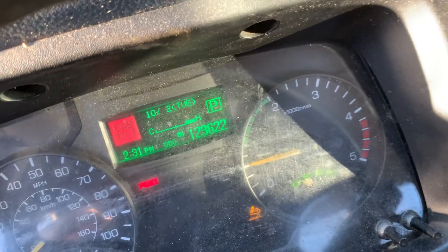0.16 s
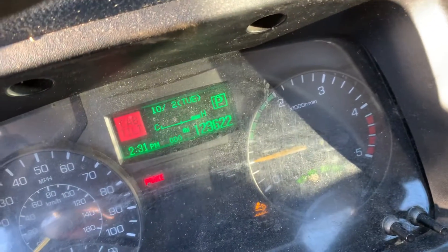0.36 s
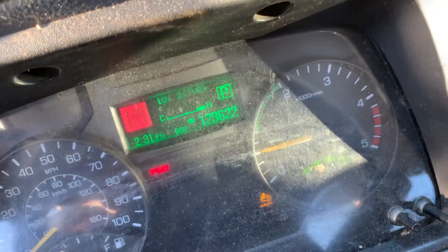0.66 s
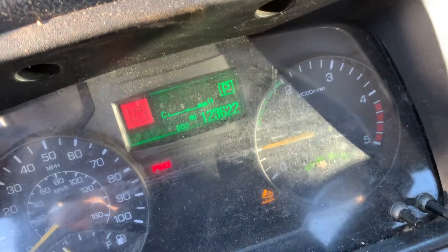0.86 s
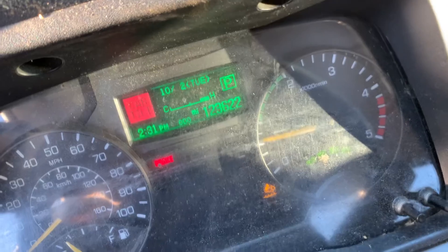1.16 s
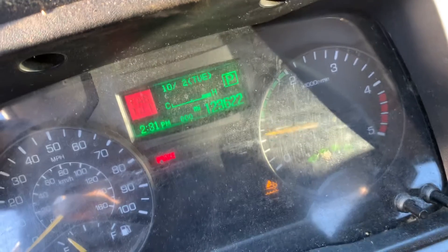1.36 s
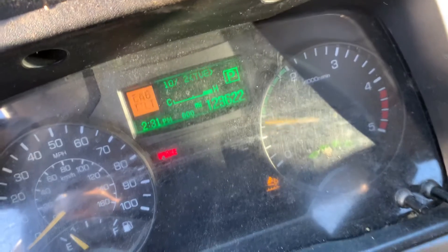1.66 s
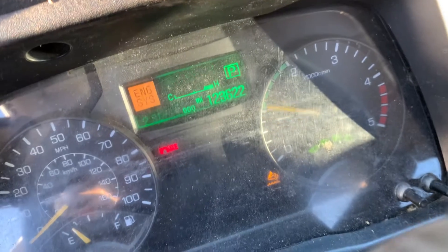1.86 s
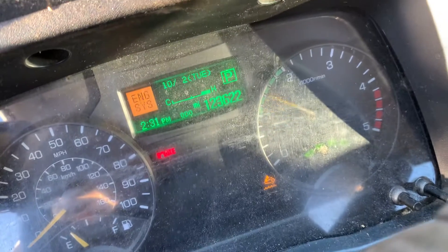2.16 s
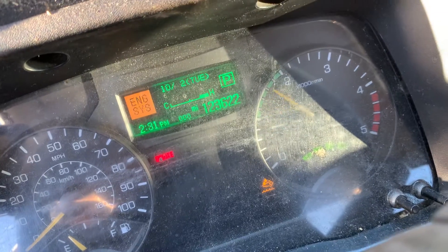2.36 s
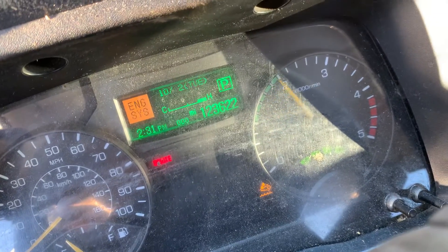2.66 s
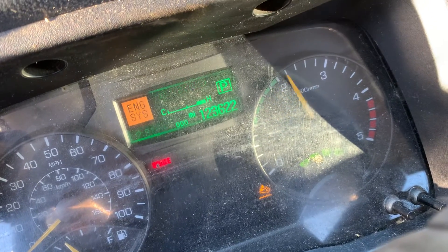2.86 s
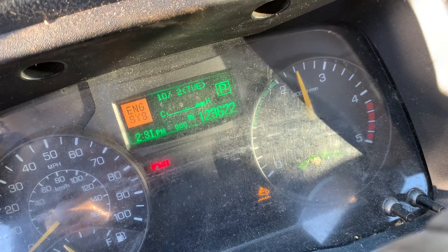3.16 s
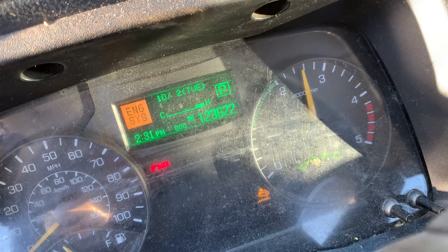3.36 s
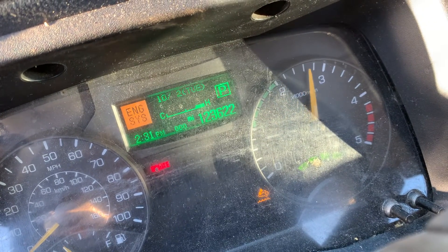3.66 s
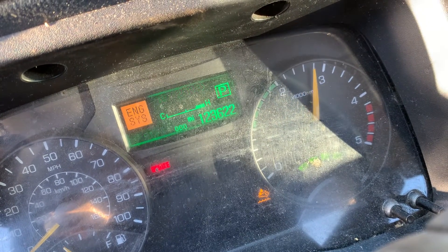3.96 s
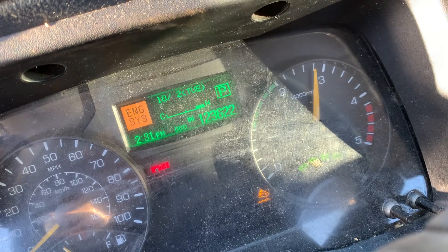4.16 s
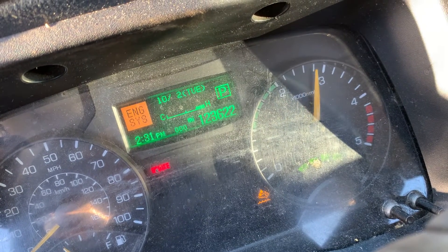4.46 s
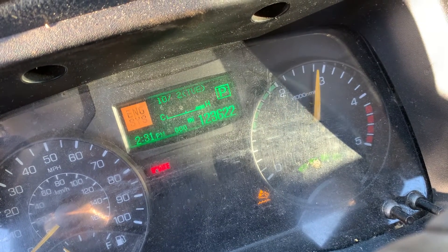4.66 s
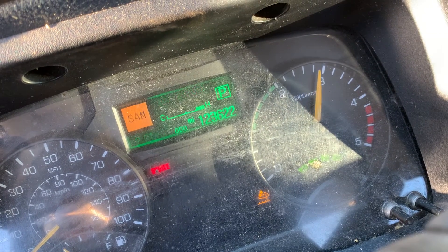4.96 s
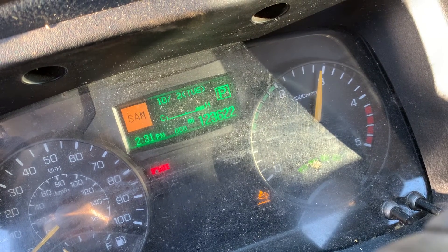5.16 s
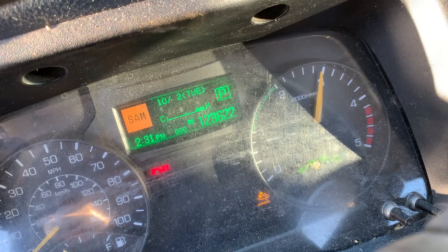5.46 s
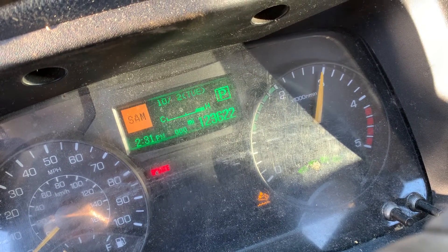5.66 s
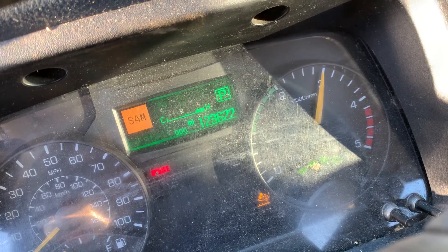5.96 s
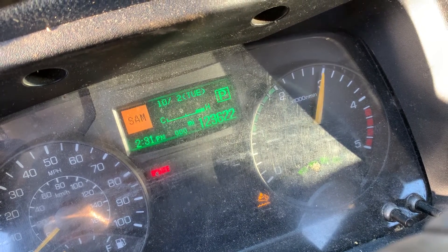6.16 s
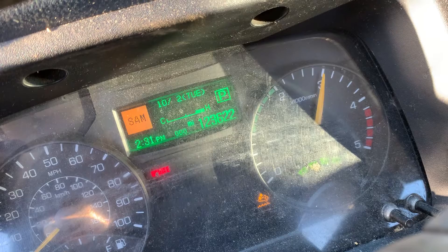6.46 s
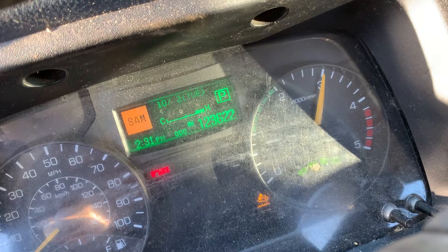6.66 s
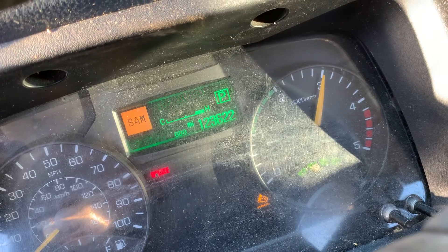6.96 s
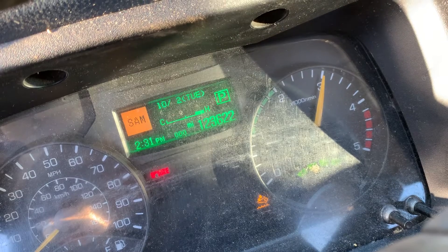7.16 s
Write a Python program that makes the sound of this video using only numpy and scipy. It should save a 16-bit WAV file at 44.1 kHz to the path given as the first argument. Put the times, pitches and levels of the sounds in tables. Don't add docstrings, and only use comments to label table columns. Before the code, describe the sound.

A diesel engine heard from the driver's seat: soft lumpy idle, two short air-valve hisses with clicking bounces, a light rub of cloth, then a quick climb in speed. The pitch more than quadruples and holds as a thick boomy drone, with rough valve clatter, intake roar, tiny key clinks, loose panels humming and a wavering whine, all close and enclosed.

```python
import sys
import numpy as np
from scipy import signal
from scipy.fft import rfft, irfft, next_fast_len
from scipy.io import wavfile
from scipy.ndimage import uniform_filter1d

SR = 44100
rng = np.random.default_rng(int(sys.argv[2]) if len(sys.argv) > 2 else 0)


def store_wav(level_fs):
    pcm = np.round(np.clip(np.atleast_2d(level_fs), -1, 1) * 32767)
    wavfile.write(sys.argv[1], SR, pcm.T.astype(np.int16))


def volts_from_decibels(level):
    exponent = np.asarray(level, float) / 20
    return 10 ** exponent


N = 321930
T = np.arange(N) / SR
MILLIS = np.arange(0, N / SR + 1, 1 / 1000)
STEP, PART = (T * 1000).astype(int), (T * 1000 % 1).astype(np.float32)
FFT_SIZE, HOP = 2048, 512
FRAMES = np.arange(N // HOP + 3) * HOP / SR
BINS = np.fft.rfftfreq(FFT_SIZE, 1 / SR)

# frequency in Hz, likeness 0-1, phase lead in rad.
PORTS = [(60, .5, 11.5), (100, .6, 3), (250, .4, 2.5), (430, .8, 0.5), (700, 1, -2.03), (1000, .8, -1.34),
         (1400, .5, -1.9), (1800, .6, 1), (2200, .6, 1.4), (3300, .5, 1.66), (6000, .5, 1.5),
         (12000, .9, 1.6)]


def evened(x):
    return x / np.sqrt(np.mean(abs(x) ** 2) + 1e-20)


def curves(rows, t):
    s, *columns = np.transpose(rows)
    return [np.interp(t, s, c) for c in columns]


def smooth(v):
    v = v.astype(np.float32)
    return v[STEP] + np.diff(v)[STEP] * PART


def drift(per_s, count):
    x = rng.standard_normal((count, len(MILLIS)))
    for _ in range(2):
        x = uniform_filter1d(x, max(int(500 / per_s), 1), axis=1)
    return x / x.std(1, keepdims=True)


def spectra(x):
    padded = np.pad(x, ((0, 0), (0, 4096)))
    return signal.stft(padded, nperseg=FFT_SIZE, noverlap=FFT_SIZE - HOP)[2][..., :len(FRAMES)]


def sound(z):
    return signal.istft(z, nperseg=FFT_SIZE, noverlap=FFT_SIZE - HOP)[1][..., :N]


def colour(points):
    hz, db = np.transpose(points)
    bins_db = np.interp(np.log(BINS + 1), np.log(hz), db, left=-120, right=-120)
    return evened(volts_from_decibels(bins_db))[:, None]


def patches(depth_db):
    field = rng.standard_normal((len(FRAMES), len(BINS))).T
    field = uniform_filter1d(field, size=7, axis=0)
    field = uniform_filter1d(field, size=9, axis=1)
    return volts_from_decibels(depth_db * evened(field))


def swell(start_s, length_s, db, fade_db_per_s):
    outside_s = np.maximum(start_s - T, T - start_s - length_s)
    return volts_from_decibels(db - fade_db_per_s * np.maximum(outside_s, 0))


def tones(cycles, table, waver_db, waver_per_s, slip_rad):
    level, phase = drift(waver_per_s, count=2 * len(table)).reshape(2, len(table), -1)
    out = np.zeros(N)
    for i, (multiple, db) in enumerate(table):
        turns = multiple * cycles
        angle = 2 * np.pi * (turns - np.floor(turns)) + smooth(9 * i * i + slip_rad * phase[i])
        out += smooth(volts_from_decibels(db + waver_db * level[i])) * np.cos(angle.astype(np.float32))
    return np.sqrt(2) * out


def glide(hz, gain, waver_db, slip_rad):
    return gain * tones(np.cumsum(hz) / SR, [(0.99, 0.00061)], waver_db, 9, slip_rad)


def bursts(white, events, points, rise_s, side_db):
    gain = np.zeros(N)
    for start_s, db, hold_s, t60_s in events:
        decay_db = 60 * np.maximum(T - start_s - hold_s, 0) / t60_s
        gain += volts_from_decibels(db - decay_db) * np.clip((T - start_s) / rise_s, 0, 1)
    return gain * sound(colour(points) * white) * volts_from_decibels([[0], [side_db]])


def at_ports(x):
    # frequency in Hz, level in dB.
    tone_side = [(60, -26), (150, -25.5), (260, -22.5), (420, -13.5), (800, 2.5), (1300, 10), (1900, -12.5),
                 (3000, -1), (11000, -4.5)]
    size = next_fast_len(N + SR)
    hz = np.fft.rfftfreq(size, 1 / SR)
    step = volts_from_decibels(curves(tone_side, hz)[0]) * np.exp(1j * curves(PORTS, hz)[1])
    return np.array([x, irfft(rfft(x, size) * step, size)[:N]])


def firing_hz(t):
    # time in seconds, firing rate in Hz.
    run_up = [(0, 21.6), (.75, 21.8), (1.12, 28.2), (1.3, 33), (1.62, 48.4), (1.75, 52.6), (1.88, 55.2),
              (2.12, 70.3), (2.38, 79.5), (2.75, 87.5), (3.1, 92.6), (3.5, 96.4), (4.03, 93.4),
              (4.42, 96.5), (4.75, 97.6), (5.6, 99.0), (6.4, 99.6), (7.3, 99.75)]
    return curves(run_up, t)[0]


def rev_share(t):
    idle_hz, rev_hz = 30, 92
    return np.clip((firing_hz(t) - idle_hz) / (rev_hz - idle_hz), 0, 1)


def effort(t):
    slow_hz, fast_hz = 21.2, 96.6
    settle_s, unsettle_hz_per_s = 0.53, 3.7
    fast = (firing_hz(t) - slow_hz) / (fast_hz - slow_hz)
    change = abs(np.gradient(firing_hz(MILLIS), MILLIS))
    change = uniform_filter1d(change, max(int(1000 * settle_s), 1))
    steady = 1 / (1 + (np.interp(t, MILLIS, change) / unsettle_hz_per_s) ** 2)

    def between(idle, drone):
        return idle + (drone - idle) * fast

    strain_db = 1.3 * np.exp(-((t - 3.4) / 0.28) ** 2)
    rumble_db = between(-32, -27) + strain_db
    locked = np.clip(between(0.38, 0.65) * steady, 0, 1)
    return rumble_db, between(-47, -34), between(-83, -70), locked


def electrics():
    # multiple of pump speed, level in dB.
    pump = [(3, -46), (4, -55), (13, -66), (14, -54.5), (15, -48), (16, -58.5), (18, -57.5)]
    # frequency in Hz, level in dB over the fizz.
    singing = [(10928, -14.5), (11122, -15.5)]
    pump_hz = 127.76
    _, _, fizz_db, _ = effort(T)
    return tones(pump_hz * T, pump, 1.2, 16, 0.97) + volts_from_decibels(fizz_db) * tones(T, singing, 1.5, 3, .3)


def touches(white):
    # start in seconds, level in dB, hold in seconds, t60 in seconds.
    key_events = [
        (3.56, -72.5, 0.0099, 0.11),
        (3.627, -71, 0.0091, .1),
        (4.223, -71, 0.025, .1),
        (6.89, -79, .02, 0.11),
    ]
    # frequency in Hz, level in dB.
    key_points = [(9600, -36), (10100, 2), (10600, -5), (11600, 0), (12300, -2.5), (12900, -47)]
    # start in seconds, level in dB, hold in seconds, t60 in seconds.
    cloth_events = [
        (1.176, -64, 0.16, 0.34),
        (1.365, -65, .1, 0.23),
    ]
    # frequency in Hz, level in dB.
    cloth_points = [(2500, -27), (3300, 17), (4500, 2.5), (6000, -14), (7800, -8), (8400, -42)]
    keys = bursts(white, key_events, key_points, 0.0044, -2.5)
    return keys + bursts(white, cloth_events, cloth_points, 0.028, -1.5)


def air_valves(white):
    # start in seconds, level in dB, hold in seconds, t60 in seconds.
    puff_events = [
        (.003, -34, .008, 0.43),
        (.010, -32.5, .014, .12),
    ]
    # frequency in Hz, level in dB.
    puff_points = [(250, -15), (420, 10), (1000, -13.5), (1650, -1.5), (1950, 1), (2350, -1), (3000, -11.5),
                   (3700, -11), (4700, -20.5), (7000, -33), (8200, -44), (9000, -74), (10000, -41),
                   (12000, -43), (13000, -67), (14200, -34), (15700, -39.5)]
    # start in seconds, level in dB, hold in seconds, t60 in seconds.
    spit_events = [
        (0.359, -44, .04, 0.24),
    ]
    # frequency in Hz, level in dB.
    spit_points = [(900, -28), (1500, -7), (2000, 7.5), (2500, -8.5), (3100, -2), (4000, -7.5), (4800, -16),
                   (7000, -34), (8200, -43), (9000, -69), (10000, -34), (12000, -38), (13000, -69),
                   (14200, -32.5), (15700, -38.5)]
    rise_s = .002
    puffs = bursts(white, puff_events, puff_points, rise_s, -2.3)
    return puffs + bursts(white, spit_events, spit_points, rise_s, -2.4)


def snaps():
    # start in seconds, level in dB.
    snap_events = [
        (.012, -37),
        (0.023, -36),
        (.048, -37),
        (.068, -36),
        (0.367, -32.5),
        (.379, -41),
        (.395, -44),
    ]
    # frequency in Hz, level in dB, t60 in seconds.
    modes = [(1700, -8, .05), (2090, -2, 0.045), (2400, -5, .05), (3170, -7, 0.072), (3740, -16, 0.042),
             (4400, -14, .05), (5750, -24, .02)]
    out, t = np.zeros(N), np.arange(4000) / SR
    phases = rng.uniform(0, 2 * np.pi, (len(snap_events), len(modes)))
    for (start_s, db), phase in zip(snap_events, phases):
        ring = np.zeros(len(t))
        for (hz, mode_db, t60_s), p in zip(modes, phase):
            ring += volts_from_decibels(db + mode_db - 60 * t / t60_s) * np.cos(2 * np.pi * hz * t + p)
        out[round(start_s * SR):][:len(t)] += ring * np.minimum(t / .0015, 1)
    return out


def panel_moans():
    # start in seconds, length in seconds, first Hz, last Hz, level in dB.
    moans = [(5.92, .12, 405, 410, -26), (6.06, .38, 410, 409, -32), (6.46, .08, 413, 418, -27.5),
             (4.16, .38, 232, 219, -30), (4.85, .3, 215, 205, -34), (2.4, .35, 402, 436, -35.5),
             (1.95, .5, 830, 850, -47), (2.8, 1.3, 815, 820, -46), (4.3, 1.1, 826, 837, -42),
             (2.9, 1.4, 385, 384, -37)]
    out = np.zeros(N)
    for start_s, length_s, first_hz, last_hz, db in moans:
        hz = np.interp(T, [start_s, start_s + length_s], [first_hz, last_hz])
        out += glide(hz, swell(start_s, length_s, db, fade_db_per_s=251.5), 1.4, .6)
    return out


def driveline_whine():
    # time in seconds, frequency in Hz.
    pitch = [(1.9, 205), (2.5, 256), (3.3, 318), (3.55, 319), (4.29, 292), (5.2, 264), (6, 252), (7.3, 245)]
    # start in seconds, length in seconds, level in dB.
    swells = [
        (2.15, 1.0, -33.5),
        (3.6, .7, -35),
        (4.5, .3, -33),
        (5.17, .6, -27.5),
        (5.95, 1.1, -31),
    ]
    gain = sum(swell(*row, fade_db_per_s=121) for row in swells)
    return glide(curves(pitch, T)[0], gain, 2.0, .25)


def intake_roar(white):
    # start in seconds, level in dB, hold in seconds, t60 in seconds.
    load = [
        (2.95, -35, 1.5, 2.9),
    ]
    # frequency in Hz, level in dB.
    roar = [(330, -32.5), (420, -2), (520, -0.5), (620, -2), (760, -30)]
    return bursts(white, load, roar, 0.25, -3.5)


def firing_tone(cycles):
    # firing rate in Hz, level in dB.
    boom = [(29, -45), (36, -14.5), (53, -14), (62.4, -33), (69, -20.5), (75, -21.5), (91, -10.5),
            (100, -14.5)]
    # firing rate in Hz, level in dB.
    octave_boom = [(21.6, -23), (28, -24.5), (31.4, -35.5), (51, -26.5), (62, -33.5), (70, -29.5),
                   (87, -31), (93, -41.5)]
    hz = firing_hz(T)
    firing = volts_from_decibels(curves(boom, hz)[0]) * tones(cycles, [(4, 0.012)], 0.73, 27, 0.043)
    return firing + volts_from_decibels(curves(octave_boom, hz)[0]) * tones(cycles, [(8, 0.0015)], 0.37, 24, 0.15)


def shaft_and_gears(cycles):
    # multiple of the engine cycle, level in dB over the rumble.
    shaft_rev = [(2, -12), (3, -18.5), (5, -12.5), (6, -16), (7, -13), (11, -18), (12, -16.5), (13, -18),
                 (15, -20.5), (16, -19), (20, -21.5), (22, -20.5)]
    # multiple of the engine cycle, level in dB over the rumble.
    shaft_idle = [(7, -7.5), (12, -4.5)]
    # frequency in Hz, level in dB over the rumble.
    body = [(88, -2), (117, -5.5), (174, -12.5), (216, -14), (243, -11), (269, -11.5)]
    gear_orders = [9, 10, 31, 32, 34, 40, 42, 51, 56, 63, 68, 69, 72, 73, 81, 83, 88, 89, 94, 240]
    gear_levels_db = [-5, -5, -17, -15, -13, -13, -14.5, -23, -18, -15, -11.5, -16, -16, -9.5, -14.5, -20,
                      -19, -16, -21, -46]
    # multiple of the engine cycle, level in dB.
    pull = [(10, -36.5), (11, -33), (40, -48), (46, -50), (47, -51), (54, -55.5)]
    # multiple of the engine cycle, level in dB.
    lug = [(7, -33.5), (9, -33), (13, -36), (14, -40.5)]
    rumble_db, clatter_db, _, locked = effort(T)
    rev = rev_share(T)
    shaft = rev * tones(cycles, shaft_rev, 3.1, 5.1, 0.65)
    shaft += (1 - rev) ** 4 * tones(cycles, shaft_idle, 4.3, 3.3, 0.31)
    shaft += (1 - rev) * tones(T, body, 3.2, 6, 1.2)
    gears = tones(cycles, list(zip(gear_orders, gear_levels_db)), 2.0, 2.4, 0.21)
    gears *= volts_from_decibels(clatter_db) * (locked / 0.68) ** 3.9
    gears += swell(2.5, 1.2, -2, fade_db_per_s=62) * tones(cycles, pull, 4, 6.1, 0.59)
    gears += swell(1.5, 0.32, -1.5, fade_db_per_s=51) * tones(cycles, lug, 2.0, 8, 0.4)
    return volts_from_decibels(rumble_db) * shaft + gears


def knocking(cycles, locked, wear_per_s):
    patterns = rng.standard_normal((2, 2, 1024))[..., (cycles % 1 * 1024).astype(int)]
    turn = wear_per_s * T
    replay = np.cos(turn) * patterns[0] + np.sin(turn) * patterns[1]
    cycles_per_s = np.gradient(cycles) * SR
    replay /= np.sqrt(25 / cycles_per_s)
    throb = 1 + 0.053 * np.cos(2 * np.pi * 4 * cycles) + 0.081 * np.cos(2 * np.pi * cycles + 1)
    locked = np.clip(locked, 0, 1)
    fresh = rng.standard_normal((2, N))
    return throb * (np.sqrt(locked) * 0.5 * replay + np.sqrt(1 - locked) * fresh)


def engine_noise(cycles, white):
    # frequency in Hz, level in dB per Hz.
    rumble_idle = [(20, -39), (32, -11), (45, -4.5), (62, 2), (90, -4.5), (115, -4), (150, -5.5),
                   (220, -8.5), (270, -1.5), (320, -20), (390, -11), (480, -25.5), (650, -20), (800, -60)]
    rumble_rev = [(20, -27), (32, -12), (48, 5), (62, 0.5), (85, -7.5), (115, 2.5), (150, -4.5), (220, 2),
                  (270, 0), (340, -10), (400, -4.5), (460, -10.5), (560, -6.5), (800, -37)]
    clatter_idle = [(380, -37), (650, -19.5), (706, -25.5), (826, -9.5), (1240, -21.5), (1320, -15),
                    (1470, -22.5), (1860, -13.5), (1980, -12), (2160, -19), (2380, -18), (2630, -30),
                    (2930, -25), (4690, -40.5), (6100, -90.5), (10300, -120)]
    clatter_rev = [(380, -37.5), (650, -2), (730, -6), (819, -1.5), (912, -7.5), (1020, -3.5),
                   (1170, -12.5), (1370, -9), (1490, -11), (1860, -4.5), (2560, -15.5), (3310, -15.5),
                   (3690, -23.5), (4690, -34.5), (6100, -66.5), (10300, -120)]
    side_idle = [(82, -42), (140, -8), (274, -11.5), (299, -15.5), (327, -8), (438, -12.5), (595, -13),
                 (649, -2.5), (762, -12.5), (1310, -9.5), (1910, -17.5), (2120, -15), (2560, -25.5),
                 (4600, -41), (5980, -77.5), (10100, -120)]
    side_rev = [(82, -58), (140, -26), (185, -7), (248, -11), (313, -9.5), (362, -10), (438, -1.5),
                (688, -0.5), (882, -8), (1070, 1), (1180, -3.5), (1610, -7.5), (1730, -9), (4600, -33),
                (5980, -62), (10100, -120)]
    # frequency in Hz, level in dB.
    fizz_points = [(4300, -25), (4900, 2.5), (5900, 3), (6600, -7), (8000, -15), (8400, -47), (9500, -46),
                   (9900, -9), (10500, -12), (11200, -5.5), (12300, -7.5), (12600, -48.5)]
    turbo_points = [(13600, -47.5), (13900, -3), (14800, 0.5), (15200, -5.5), (15500, -20), (15800, -43)]
    side_idle_db, side_rev_db = 7, 6.5
    turbo_idle_db, turbo_rev_db = -8, -0.5
    rumble_db, clatter_db, fizz_db, _ = effort(FRAMES)
    rev = rev_share(FRAMES)

    def blend(idle, full):
        return idle ** (1 - rev) * full ** rev

    drive = knocking(cycles, effort(T)[3], wear_per_s=1.323)
    first, second = patches(depth_db=2) * spectra(drive)
    rumble = volts_from_decibels(rumble_db) * blend(colour(rumble_idle), colour(rumble_rev))
    clatter = volts_from_decibels(clatter_db) * blend(colour(clatter_idle), colour(clatter_rev))
    mid = np.hypot(rumble, clatter)
    side = blend(volts_from_decibels(side_idle_db) * colour(side_idle), volts_from_decibels(side_rev_db) * colour(side_rev))
    side = volts_from_decibels(clatter_db) * side
    turbo = blend(volts_from_decibels(turbo_idle_db), volts_from_decibels(turbo_rev_db)) * colour(turbo_points)
    fizz = volts_from_decibels(fizz_db) * (colour(fizz_points) + turbo) * white[0]
    like, lead_rad = (c[:, None] for c in curves(PORTS, BINS))
    like = np.clip(like, 0, 1)
    linked = like * np.exp(1j * lead_rad) * first + np.sqrt(1 - like ** 2) * second
    quarter_turn = np.array([1, 1.1j])[:, None, None]
    return sound(np.array([mid * first, side * linked]) + fizz * quarter_turn)


def scene():
    cycles = np.cumsum(firing_hz(T)) / 4 / SR
    white = patches(depth_db=1.4) * spectra(rng.standard_normal((2, N)))
    pure = electrics() + snaps() + panel_moans() + driveline_whine()
    pure += firing_tone(cycles) + shaft_and_gears(cycles)
    hisses = touches(white) + air_valves(white) + intake_roar(white)
    mid, side = hisses + at_ports(pure) + engine_noise(cycles, white)
    return np.array([mid + side, mid - side])


def roll_off(x):
    return signal.sosfilt(signal.butter(12, 15720, fs=SR, output="sos"), x)


def record(dry):
    low_cut = signal.butter(3, 30, "highpass", fs=SR, output="sos")
    mix = signal.sosfilt(low_cut, dry)
    return roll_off(mix)


dry = scene()
out = record(dry)
store_wav(out)
```